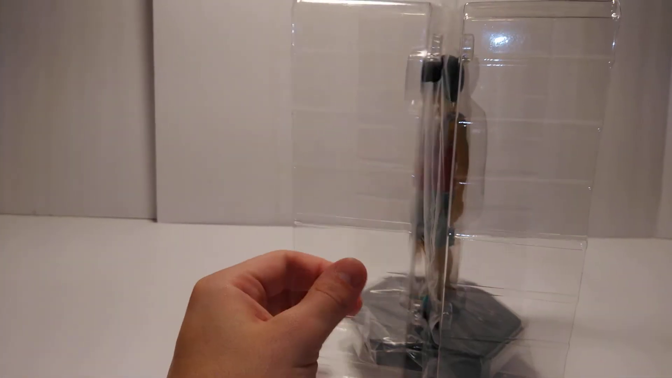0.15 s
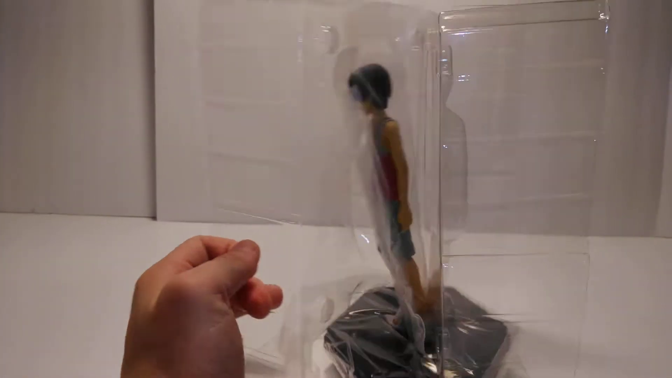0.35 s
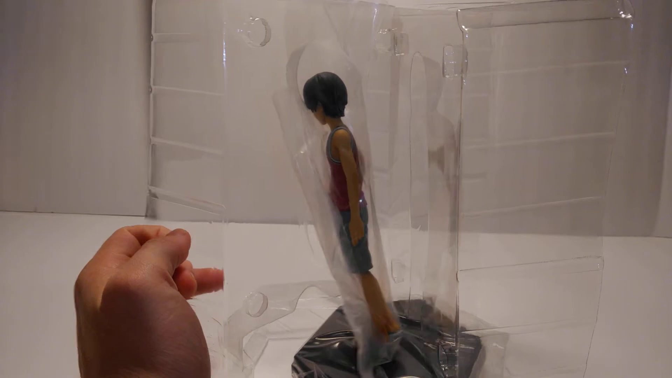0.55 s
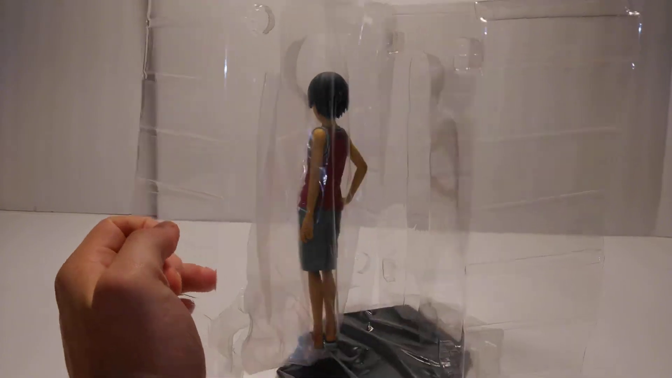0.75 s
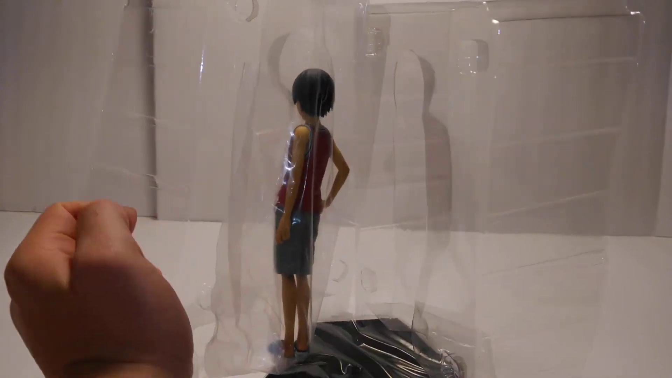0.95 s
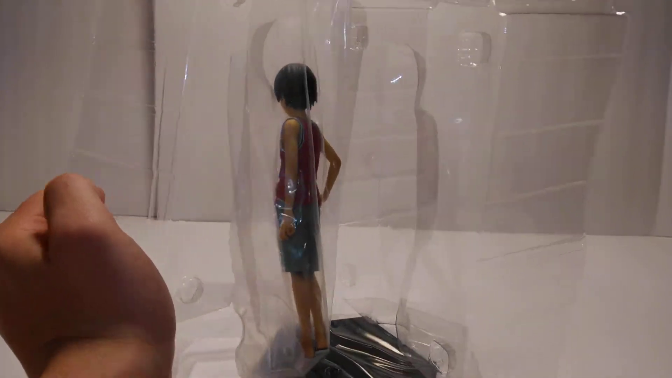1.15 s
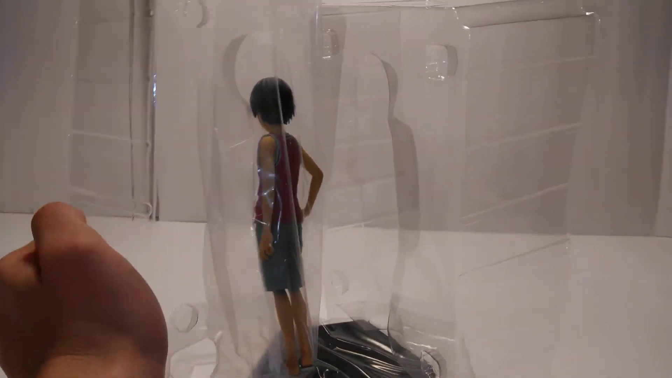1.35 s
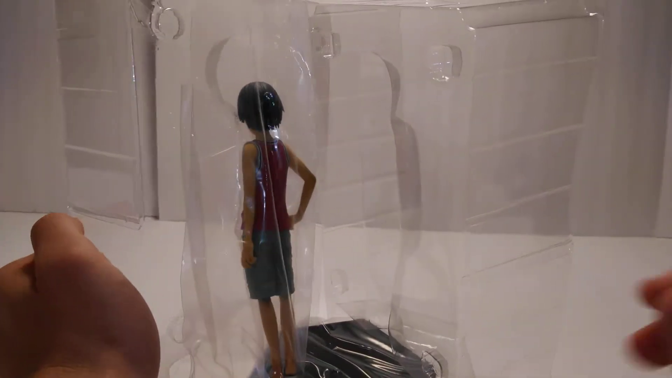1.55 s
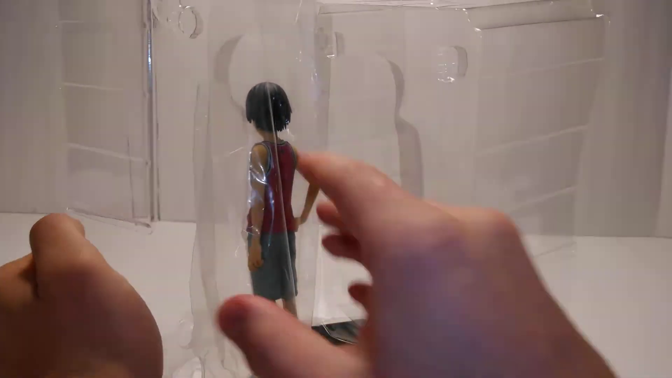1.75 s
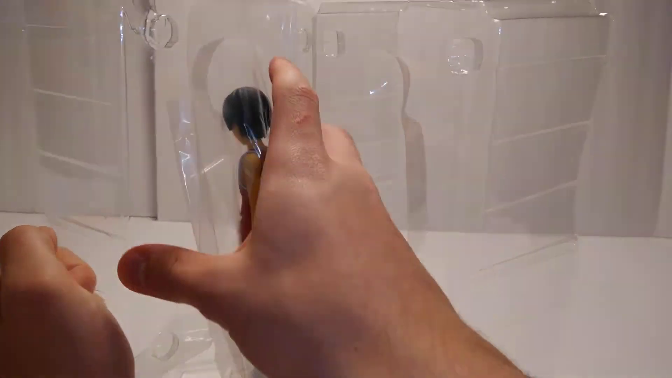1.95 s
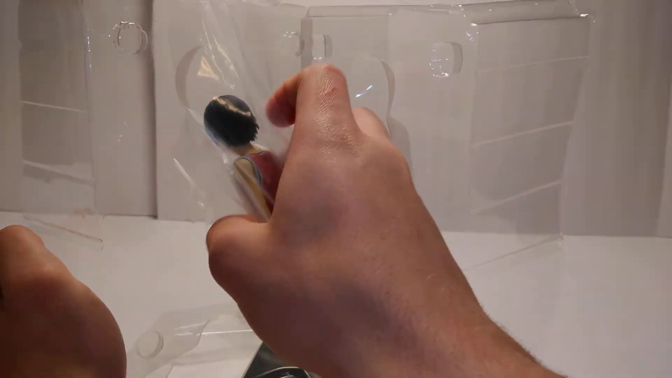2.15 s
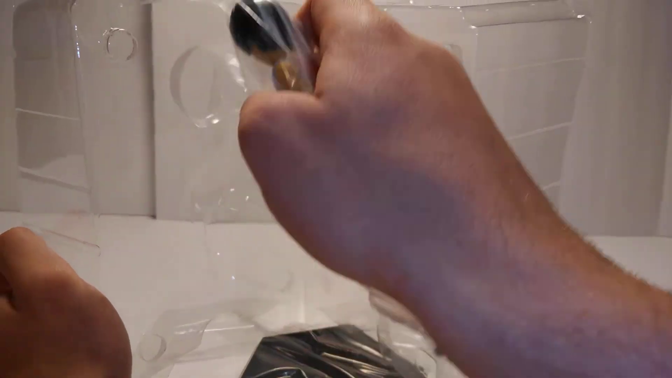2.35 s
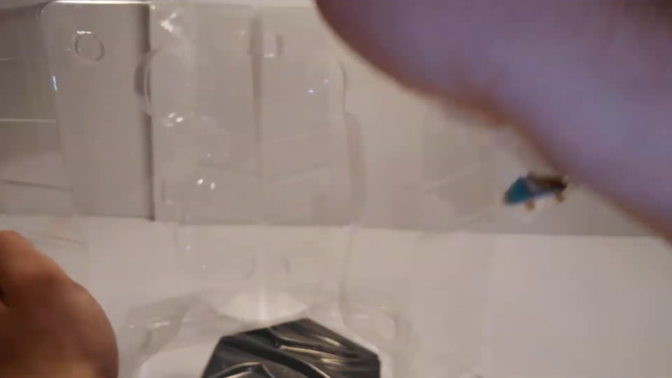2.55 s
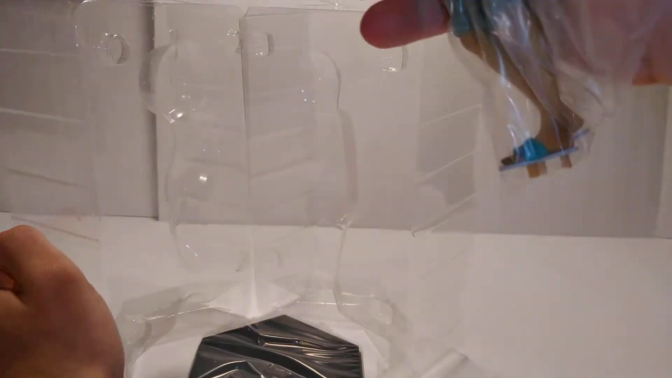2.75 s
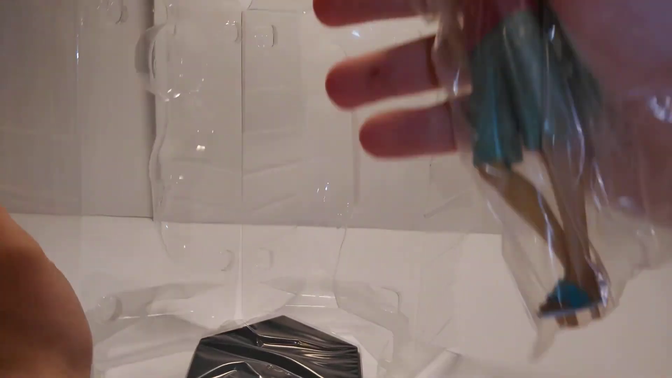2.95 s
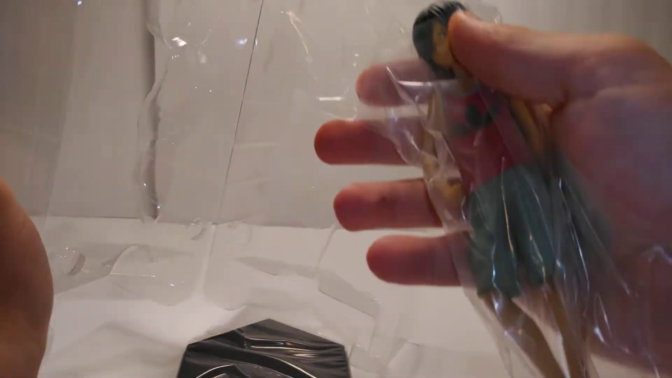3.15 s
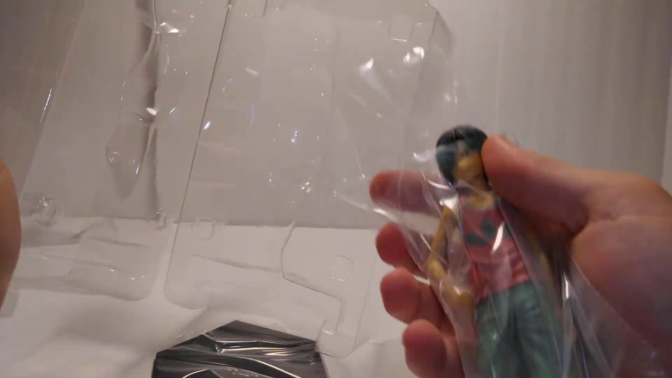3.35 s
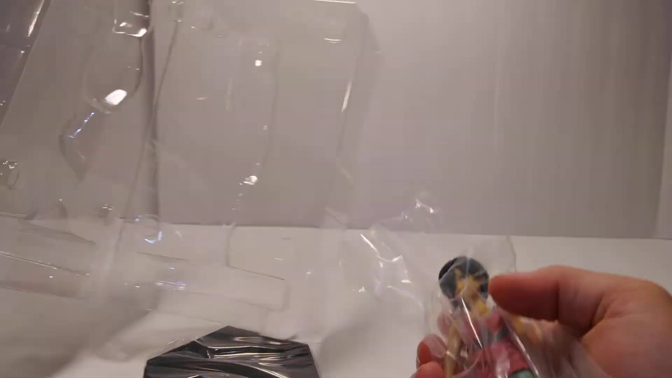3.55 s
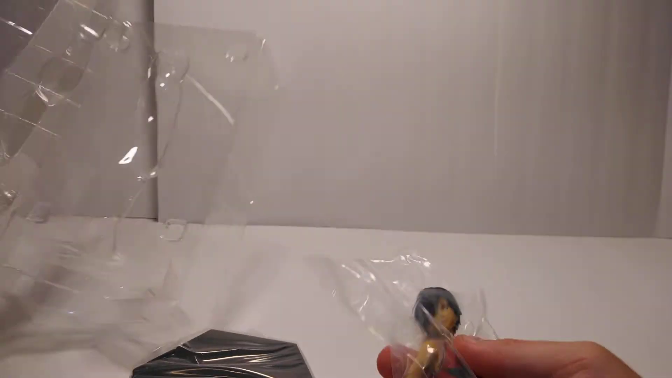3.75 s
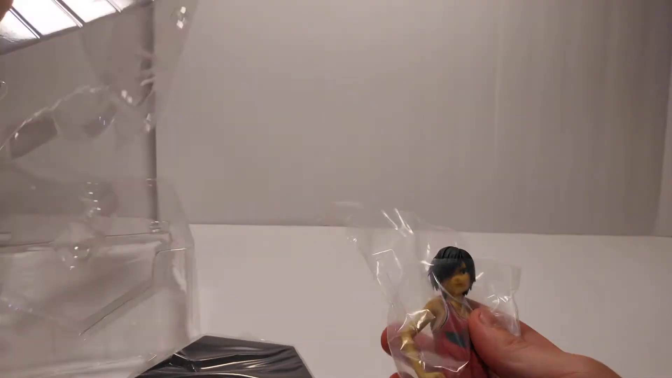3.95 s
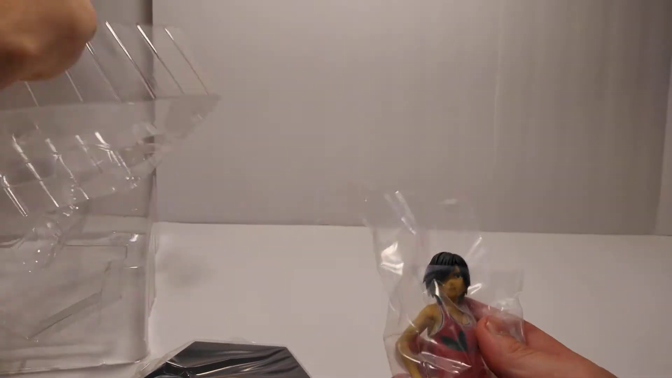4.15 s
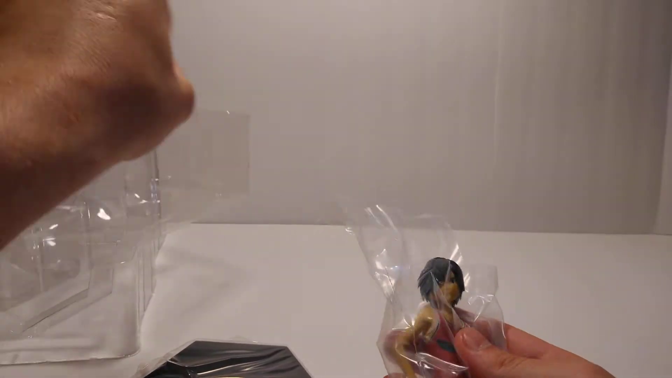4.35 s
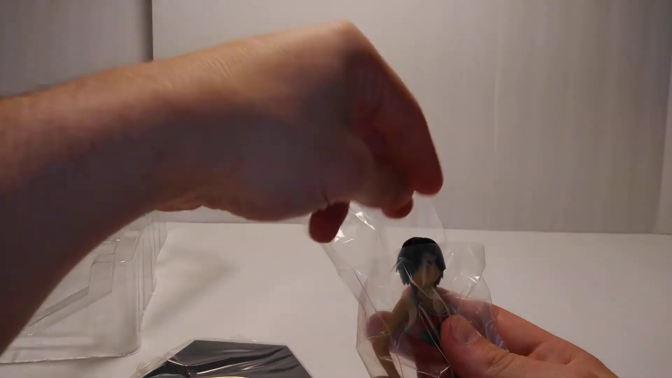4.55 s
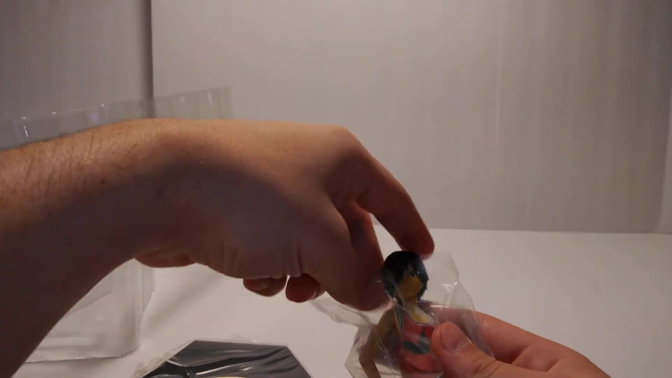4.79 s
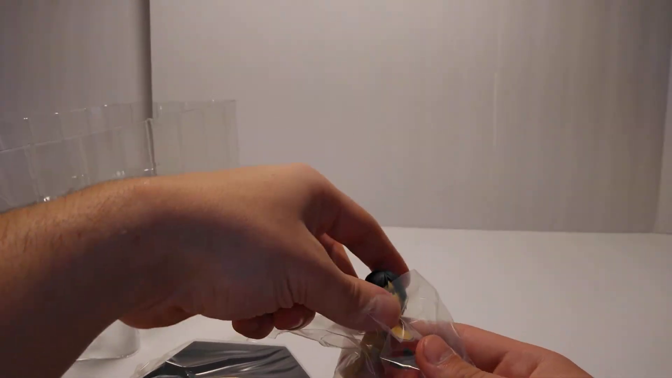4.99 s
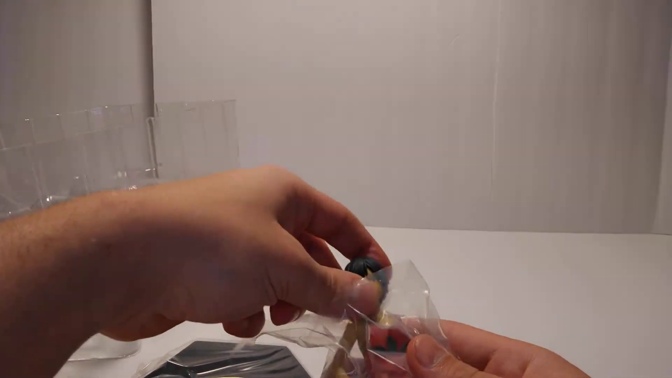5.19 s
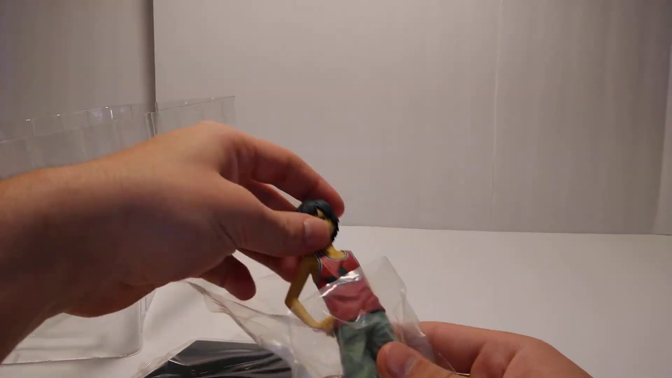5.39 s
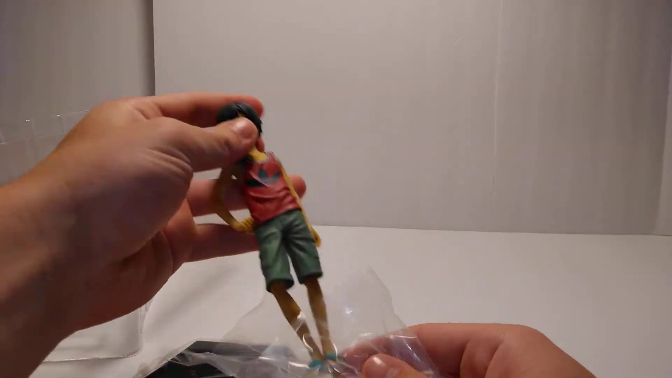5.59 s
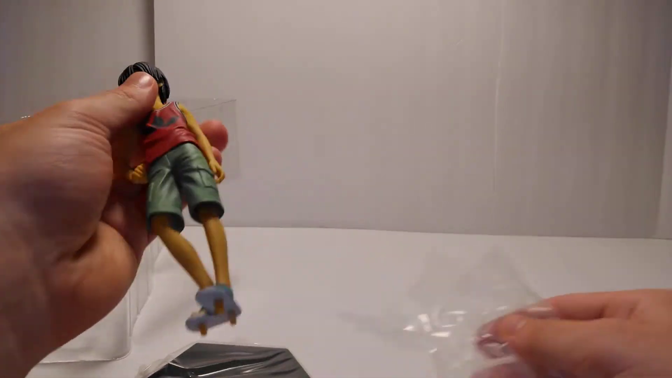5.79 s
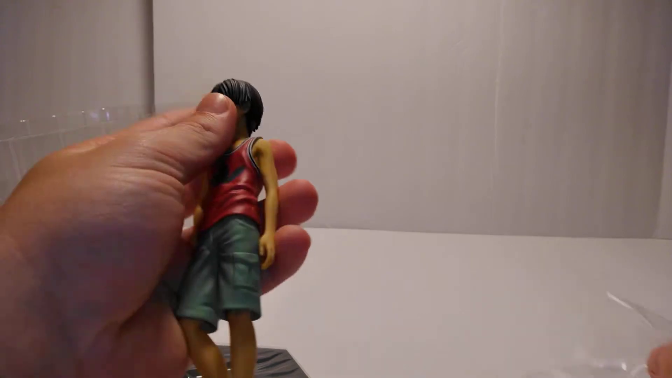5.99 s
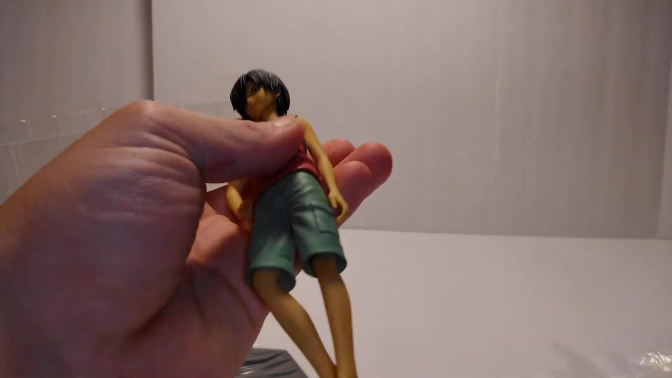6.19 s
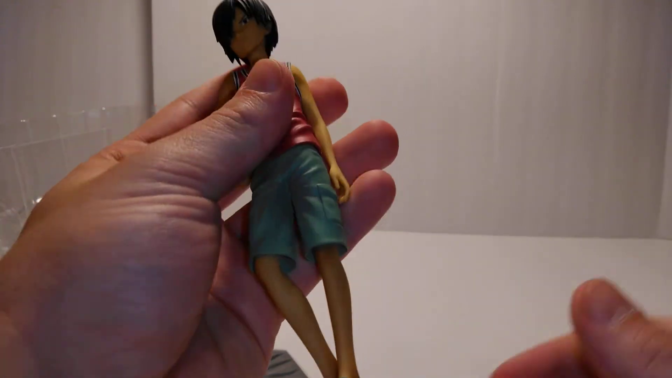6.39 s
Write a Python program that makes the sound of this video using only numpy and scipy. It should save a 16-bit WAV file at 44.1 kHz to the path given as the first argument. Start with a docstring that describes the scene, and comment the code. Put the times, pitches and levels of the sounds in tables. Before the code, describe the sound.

Stiff plastic tray clicks, knocks and scrapes on a table, then a sharp tearing crack and busy crackling of a thin plastic bag.

```python
"""Unpacking a figure from a plastic tray

Hands open a stiff plastic tray on a table and pull a thin bag off a small figure, close to two microphones.
The film is hiss in drifting patches of pitch plus clumped grains of crackle; single creases are noise bursts.
The hollow tray is a bank of decaying modes, struck for knocks and rattles and fed dense slips for drags.
Sparse reflections of a small quiet room and its soft air noise lie behind."""
import sys
import numpy as np
from scipy import signal
from scipy.fft import rfft, irfft, next_fast_len
from scipy.io import wavfile
from scipy.ndimage import uniform_filter1d

SR = 44100
rng = np.random.default_rng(int(sys.argv[2]) if len(sys.argv) > 2 else 0)


def persist_wave(psi):
    """Save psi, clipped to +-1, as 16-bit WAV."""
    counts = np.round(np.clip(psi, -1, 1) * 32767).astype(np.int16)
    wavfile.write(sys.argv[1], SR, np.atleast_2d(counts).T)


def rack_gain(trim_db):
    """Turn a fader trim in dB into the linear factor to multiply a signal by."""
    fader = np.asarray(trim_db, float)
    return 10 ** (fader / 20)


N = 283563  # length in samples

# colour of the room air, relative: freq_hz, density_db (per Hz)
AIR_COLOUR = [(30, 39), (100, 6), (300, 21), (1000, -6.5), (2500, -7), (8000, -33), (16000, -18)]
AIR_RMS_DB = -82
# how long the room rings: freq_hz, t60_s
ROOM_DECAY = [(150, 0.11), (1000, 0.13), (5000, 0.28), (15000, 0.2)]
# tone of the two microphone ports: freq_hz, left_minus_right_db
PORT_TONE = [(90, -2), (500, 0.2), (2800, 1), (5000, -3), (9000, -2), (14000, 13)]
MIC_LOW_HZ = 81

# ringing modes of the hollow tray: mode_hz, relative level_db, t60_s
TRAY_MODES = [(85, -11, 0.16), (162, -10, 0.26), (213, -9, 0.12), (261, -2.5, 0.06), (335, 6, 0.069),
              (488.6, 6, 0.071), (691, 10, 0.061), (872.6, 10, 0.051), (1062, 7.5, 0.018),
              (1421, 8.5, 0.069), (1987, 16.5, 0.037)]
# the tray bumps the table or pops: start_s, level_db (peak), strongest_hz, rattle_s (decay constant)
TRAY_KNOCKS = [(0.309, -26.5, 474, 0.017), (0.4396, -26.5, 260, 0.014), (0.7944, -28, 300, 0.015),
               (0.936, -35, 355, 0.0015), (1.3037, -31, 318, 0.013), (1.901, -38.5, 157, 0.0086),
               (2.095, -31.5, 229, 0.11), (2.526, -18.5, 970, 0.011), (2.578, -30.5, 304, 0.0073),
               (2.955, -41.5, 200, .01), (3.196, -23, 1060, 0.018), (3.219, -30, 345, 0.013),
               (3.239, -34, 320, 0.0032), (3.264, -28, 433, 0.01), (3.33, -32.5, 493, 0.009),
               (3.3872, -28.5, 334, 0.015), (3.994, -34.5, 317, 0.0089), (4.123, -34.5, 231, 0.025),
               (4.349, -38, 1070, 0.02), (4.395, -31.5, 1090, 0.0034), (4.714, -35, 1070, 0.0051),
               (6.424, -50, 326, .005)]
# the tray is pushed or shaken: start_s, length_s, rim_scrape_db, wall_flex_db
TRAY_SHOVES = [(0.209, 0.012, -49, -80), (0.297, 0.25, -45.5, -42.5), (0.786, 0.04, -49.5, -46),
               (1.048, 0.058, -60, -53), (1.246, 0.032, -52.5, -59), (1.298, 0.056, -56, -49),
               (1.88, 0.028, -56.5, -57), (2.048, 0.23, -40.5, -50), (2.517, 0.13, -40.5, -37),
               (2.756, 0.12, -46.5, -77), (2.943, 0.069, -49, -54), (3.189, 0.093, -39.5, -39.5),
               (3.337, 0.082, -57, -46), (3.988, 0.035, -44, -35.5), (4.112, 0.039, -43.5, -40),
               (4.344, 0.046, -49.5, -66), (4.693, 0.02, -48.5, -72), (5.825, 0.055, -49, -63),
               (6.375, 0.075, -88.5, -50)]
# plastic slides on plastic, singing on one facet: start_s, length_s, first_db, last_db, pitch_hz
TRAY_SLIDES = [(0.293, 0.84, -53, -60.5, 1400), (2.769, 0.089, -47, -42.5, 882),
               (2.765, 0.11, -48.5, -45.5, 1550)]
SHOVE_ATTACK_S, SHOVE_SAG_DB_PER_S, SHOVE_RELEASE_DB_PER_S = 0.0077, 48, 235
LEFT_LAG_S = 0.00015  # the tray is nearer the right port

# faint stir of holding things between the separate sounds: time_s, film_db, rim_db, walls_db
HOLDING_STIR = [(0, -48.5, -92, -78), (.2, -57, -64.5, -64), (.52, -58.5, -62.5, -61.5),
                (1.05, -51, -56.5, -62.5), (1.36, -59.5, -80, -71), (1.45, -68, -73.5, -69),
                (1.64, -60.5, -62.5, -67), (1.71, -86, -68, -75), (1.87, -73, -65, -72),
                (2.04, -52, -55, -53.5), (2.46, -45.5, -60, -55), (2.92, -54, -66, -60.5),
                (3.6, -56.5, -57.5, -62), (4.25, -48, -57, -56.5), (4.5, -83, -54, -60),
                (4.67, -77, -56, -62), (5.02, -59.5, -57.5, -66.5), (5.16, -62, -70.5, -87),
                (5.6, -77, -60.5, -62), (6.1, -59, -60, -61), (6.16, -61, -79, -63),
                (6.43, -71.5, -88.5, -69.5)]

# colour of the film, relative: freq_hz, density_db (per Hz)
FILM_COLOUR = [(100, -21.5), (700, -13), (2000, -4), (4000, -4.5), (6000, -3.5), (8000, -0.5), (11000, -3),
               (15500, -15), (16900, -63.5)]
# where the film lies between the microphones: time_s, left_minus_right_db
FILM_SIDE = [(1.3, 1), (1.7, -5), (2.6, -1.5)]
# how the film is handled; the thin bag has less body:
# time_s, crackle_share (0-1, the rest is rubbing), body_db (gain under 4 kHz)
FILM_HANDLING = [(0, 0.033, -11.5), (.2, 0.07, -20), (.25, 0.092, 8.5), (.6, 0.38, 2.5), (1.2, 0.56, -3.5),
                 (1.6, 0.75, -17), (2.1, 0.78, 5), (2.27, 0.62, -10.5), (2.6, 0.15, 1.5),
                 (2.95, 0.52, -0.5), (3.72, 0.69, 4), (3.8, 0.037, -11), (4.0, 0.85, 1.5), (5.1, 0.86, 3),
                 (5.7, 0.84, -2.5), (5.95, 0.55, 4.5), (6.43, 0.6, 2.5)]
# separate rubs and pulls of the film: start_s, length_s, first_db, last_db
FILM_RUBS = [(0.218, 0.05, -36.5, -51), (0.289, .16, -44.5, -38.5), (2.083, 0.087, -38.5, -36.5),
             (2.24, 0.046, -28, -28), (2.367, 0.023, -19.5, -41), (2.517, 0.17, -29.5, -41.5),
             (2.758, 0.11, -34.5, -39.5), (2.928, 0.072, -44, -42), (3.02, 0.032, -44, -37),
             (3.207, 0.059, -46, -43), (3.5, 0.053, -51, -40.5), (3.697, 0.19, -39.5, -31.5),
             (3.982, 0.038, -34.5, -42), (4.072, 0.081, -37, -41), (4.251, 0.026, -37.5, -41.5),
             (4.338, 0.13, -47.5, -59), (4.551, 0.062, -43, -58), (4.687, 0.09, -47.5, -51),
             (4.823, 0.14, -45.5, -56.5), (5.234, 0.16, -49.5, -38.5), (5.419, 0.071, -33.5, -51),
             (5.476, 0.18, -38, -34.5), (5.663, 0.041, -36, -38), (5.757, 0.15, -47, -55)]
RUB_ATTACK_S, RUB_RELEASE_DB_PER_S = 0.017, 405
# creases that flip over, levels ahead of the left-right balance: start_s, level_db (peak), pitch_hz
CREASES = [(0.295, -28, 11100), (0.3069, -19.5, 3160), (0.5904, -19.5, 10700), (0.675, -26, 7550),
           (0.7094, -22, 2350), (0.7327, -26, 5640), (0.793, -26.5, 2040), (0.832, -30.5, 6950),
           (0.9213, -34.5, 7540), (1.069, -23.5, 11100), (1.2516, -35.5, 8240), (1.276, -27.5, 8100),
           (1.3437, -28.5, 11200), (1.6038, -35, 8100), (1.6353, -32, 8400), (1.903, -36.5, 2250),
           (1.94, -28.5, 2660), (2.065, -24.5, 10500), (2.078, -21.5, 10300), (2.101, -25, 7400),
           (2.166, -21, 4100), (2.194, -20.5, 11100), (2.214, -21, 5300), (2.309, -13, 8500),
           (2.349, -19, 2770), (2.3763, -20, 7000), (2.5033, -19.5, 8000), (2.7222, -22, 7200),
           (2.979, -25.5, 9510), (2.9962, -23, 8450), (3.1148, -22, 6850), (3.1269, -21.5, 8050),
           (3.1942, -25, 2500), (3.221, -25.5, 9780), (3.3555, -23.5, 8400), (3.384, -24.5, 2560),
           (3.438, -26, 7700), (3.539, -18.5, 8250), (3.654, -25, 10700), (3.6653, -20.5, 12300),
           (3.688, -21, 8100), (3.7731, -20, 8260), (3.993, -25, 9800), (4.1262, -26, 7400),
           (4.2627, -34, 8200), (4.347, -28.5, 4500), (4.3833, -24, 10400), (4.4173, -31, 7850),
           (4.49, -31.5, 11100), (4.5192, -23.5, 11500), (4.559, -26.5, 1990), (4.687, -30, 10800),
           (4.7318, -29, 3230), (4.804, -32, 7290), (4.8209, -30, 5760), (4.8388, -25.5, 6340),
           (4.9124, -30.5, 7030), (4.9728, -24.5, 3830), (5.0355, -35, 5000), (5.0853, -37, 7240),
           (5.181, -21, 8900), (5.234, -29.5, 7540), (5.2506, -26, 8100), (5.321, -22.5, 9500),
           (5.436, -26, 10100), (5.603, -24, 7220), (5.6261, -20, 8250), (5.6972, -23, 10100),
           (5.786, -23, 7900), (5.8009, -26.5, 5040), (5.9798, -36, 5940), (6.0344, -42, 4320),
           (6.0532, -32, 4170), (6.2174, -32.5, 6640), (6.251, -36, 9400)]
# the figure tears free of the tray in one run of creases: start_s, level_db (peak of the first), length_s
TEAR_FREE = (2.5255, -6.5, 0.0085)


def evened(x):
    """Scales to rms 1."""
    return x / np.sqrt(np.mean(x ** 2) + 1e-20)


def read(points, hz):
    """Reads a table along log frequency."""
    freq, value = np.transpose(points)
    return np.interp(np.log(hz + 1), np.log(freq + 1), value)


def curve(rows, column):
    """Draws one column of a table over time, sample by sample."""
    rows = np.array(rows)
    return np.interp(np.arange(N) / SR, rows[:, 0], rows[:, column])


def add(mix, start_s, sound):
    """Mixes a pair of channels in at its start time."""
    part = mix[:, round(start_s * SR):][:, :sound.shape[1]]
    part += sound[:, :part.shape[1]]


def coloured(x, db_at):
    """Filters the last axis by a gain in dB, given as a function of Hz."""
    size = next_fast_len(x.shape[-1])
    gain = rack_gain(db_at(np.fft.rfftfreq(size, 1 / SR)))
    return irfft(rfft(x, size) * gain, size)[..., :x.shape[-1]]


def pair(a, b, same, lag):
    """Two microphones hear a shared part, the left late by lag samples, and the right a part of its own."""
    right = same * a + np.sqrt(1 - same ** 2) * b
    return np.array([np.roll(a, lag), right])


def effort(rest_db, bursts, attack_s, release_db_per_s):
    """A resting level plus bursts that set in fast and die away; powers add, and the result is in dB."""
    t = np.arange(0, N, 32) / SR
    power = rack_gain(2 * rest_db[::32])
    for start, length, first_db, last_db in bursts:
        held_db = np.interp(t, [start, start + length], [first_db, last_db])
        fall_db = release_db_per_s * np.maximum(t - start - length, 0)
        onset = np.clip((t - start) / attack_s, 0, 1)
        power = power + (onset * rack_gain(held_db - fall_db)) ** 2
    return np.interp(np.arange(N) / SR, t, 10 * np.log10(power + 1e-20))


def hush():
    """The quiet air of the room: steady coloured noise, partly shared by the two microphones."""
    a, b = rng.standard_normal((2, N))
    air = coloured(pair(a, b, same=0.28, lag=0), lambda f: read(AIR_COLOUR, f))
    return rack_gain(AIR_RMS_DB) * evened(air)


def room(x):
    """Sparse reflections from 9 ms on, each band dying at its own speed."""
    taps = np.zeros((2, SR // 2))
    slots = np.arange(400, SR // 2 - 20, 20)
    places = slots + rng.integers(0, 20, (2, len(slots)))
    signs = rng.choice([-1., 1.], (2, len(slots)))
    np.put_along_axis(taps, places, signs, 1)
    hz, t, z = signal.stft(taps, SR, nperseg=256)
    decay = rack_gain(-60 * t / read(ROOM_DECAY, hz)[:, None])
    tail = signal.istft(z * decay, SR, nperseg=256)[1]
    tail = tail / np.linalg.norm(tail[0])
    return signal.oaconvolve(x.mean(0)[None], tail, axes=1)[:, :N]


def ring(centre_hz, slope_db, detune, modes=TRAY_MODES):
    """The tray's answer to a tap: modes near centre_hz favoured by slope_db per octave, detuned by the grip."""
    hz, db, t60 = np.transpose(modes)[:, :, None]
    grip, spot, step = rng.standard_normal((3, len(modes), 1))
    t = np.arange(6000) / SR
    level_db = db - slope_db * abs(np.log2(hz / centre_hz)) + 2.6 * spot - 60 * t / t60
    # the right leads the left, and high modes are further out of step
    lead = 2 * np.pi * hz * LEFT_LAG_S + np.clip(.3 + hz / 1800, 0, 3) * step
    phase = np.array([0, 1])[:, None, None] * lead
    swing = np.sin(2 * np.pi * hz * (1 + detune * grip) * t + phase)
    return (rack_gain(level_db) * swing).sum(1)


def slips(level_db, centre_hz, slope_db, detune, modes=TRAY_MODES, count=12):
    """Dense uneven slips, 1600 a second, each ringing one of a few spots of the plastic."""
    strength = rng.standard_normal(N) * rack_gain(4.1 * np.minimum(rng.exponential(1, N), 3))
    hits = strength * (rng.random(N) < 1600 / SR)
    hits = rack_gain(level_db) * evened(hits)
    spot, out = rng.integers(0, count, N), np.zeros((2, N))
    for k in range(count):
        answer = ring(centre_hz, slope_db, detune, modes)
        answer = answer / np.linalg.norm(answer[0])
        out += signal.oaconvolve((hits * (spot == k))[None], answer, axes=1)[:, :N]
    return out


def drag():
    """The rim scrapes the table and rings the small facets; the walls flex and boom; the slides sing."""
    def shove_db(column):
        bursts = [(row[0], row[1], row[column], row[column] - SHOVE_SAG_DB_PER_S * row[1])
                  for row in TRAY_SHOVES]
        return effort(curve(HOLDING_STIR, column), bursts, SHOVE_ATTACK_S, SHOVE_RELEASE_DB_PER_S)

    out = slips(shove_db(2), 1003, slope_db=10.5, detune=0.065)  # rim
    out += slips(shove_db(3), 275, slope_db=17.0, detune=0.087)  # walls
    silence_db = np.full(N, -np.inf)
    for *burst, hz in TRAY_SLIDES:
        slide_db = effort(silence_db, [burst], SHOVE_ATTACK_S, SHOVE_RELEASE_DB_PER_S)
        out += slips(slide_db, hz, slope_db=0, detune=0.013, modes=[(hz, 0, .04)], count=4)
    return out


def knocks():
    """A firm blow of a few swings, the ringing tray and a dying rattle; soft blows wake fewer distant modes."""
    out, t = np.zeros((2, N)), np.arange(4096) / SR
    for start_s, db, hz, rattle_s in TRAY_KNOCKS:
        chance = rng.random(len(t)) < .012
        taps = rng.standard_normal(len(t)) * chance * .45 * np.exp(-t / max(rattle_s, .001))
        taps[0] = 1  # the blow itself
        ringing = signal.fftconvolve(taps[None], ring(hz, slope_db=-0.25 * db, detune=0.076), axes=1)
        ringing = ringing / abs(ringing.mean(0)).max()
        add(out, start_s, -rack_gain(db - 2.5) * ringing)
        swings = hz * np.maximum(t - np.array([[LEFT_LAG_S], [0]]), 0)
        blow = np.sin(2 * np.pi * swings) * np.exp(-swings / 1.36)  # dies within a few cycles
        add(out, start_s, -rack_gain(db) * blow)
    return out


def rubbing():
    """Hiss of film on film; small facets light up in short patches of pitch, and the pressure flutters."""
    hiss = pair(*rng.standard_normal((2, N)), same=0.11, lag=5)
    hz, _, z = signal.stft(hiss, SR, nperseg=256)
    patches = rng.standard_normal(z.shape[:0:-1])
    patches = uniform_filter1d(uniform_filter1d(patches, 8, 0), 3, 1).T  # 8 frames by 3 bins
    flutter = uniform_filter1d(rng.standard_normal(z.shape[2]), 2)
    level_db = read(FILM_COLOUR, hz)[:, None] + 3.8 * evened(patches) + 1.0 * evened(flutter)
    return evened(signal.istft(z * rack_gain(level_db), SR, nperseg=256)[1][:, :N])


def snap(hz, noise, lag, decay_s=0.0012, ring_db=10):
    """A flipping crease: a quick burst that favours the pitch of its facet, then a faint shiver. Peak 1."""
    def facet_db(f):
        octaves_off = np.log2((f + 1) / hz)
        return 0.97 * read(FILM_COLOUR, f) + ring_db * np.exp(-(octaves_off / 0.36) ** 2)

    t = np.arange(noise.shape[1]) / SR
    flip = 4.25 * (np.arange(len(t)) == 24)  # the needle-sharp moment of buckling
    fade = np.exp(-t / decay_s) + 0.07 * np.exp(-t / 0.0083)  # burst, then shiver
    onset = 1 - np.exp(-t / 0.00086)
    a, b = coloured(noise + flip, facet_db) * fade * onset
    both = pair(a, b, same=0.19, lag=lag)
    return both / abs(both).max(1)[:, None]


def crackle():
    """Countless small creases of many sizes and 24 pitches, coming in clumps."""
    clumps = rack_gain(7.3 * evened(uniform_filter1d(rng.standard_normal(N), 500)))
    chance = 280 * clumps / SR  # 280 a second where the clumping is neutral
    size = rack_gain(3.5 * np.minimum(rng.exponential(1, N), 3)) * (rng.random(N) < chance)
    kind, out = rng.integers(0, 24, N), np.zeros((2, N))
    for k, hz in enumerate(np.geomspace(2500, 12000, 24)):
        noise = rng.standard_normal((2, 512))
        grain = snap(hz, noise, rng.integers(0, 11), decay_s=0.0018, ring_db=6)
        out += signal.oaconvolve((size * (kind == k))[None], grain, axes=1)[:, :N]
    return evened(out)


def snaps():
    """The loud single creases, and the fading run of them as the figure comes free."""
    out = np.zeros((2, N))
    for start_s, db, hz in CREASES:
        noise = rng.standard_normal((2, 1024))
        add(out, start_s, rack_gain(db) * snap(hz, noise, rng.integers(0, 11)))
    start_s, db, length_s = TEAR_FREE
    for late_s in np.arange(0, length_s, .0011):
        hz, noise = rng.uniform(5200, 18000), rng.standard_normal((2, 1024))
        add(out, start_s + late_s, rack_gain(db - 290 * late_s) * snap(hz, noise, lag=4))
    return out


def film():
    """Rubbing and crackle share the effort of the fingers; stiffer plastic has more body."""
    share = np.clip(curve(FILM_HANDLING, column=1), 0, 1)
    rustle = np.sqrt(1 - share) * rubbing() + np.sqrt(share) * crackle()
    body = coloured(rustle, lambda f: -10 * np.log10(1 + (f / 4000) ** 6))
    rustle = rustle + (rack_gain(curve(FILM_HANDLING, column=2)) - 1) * body
    effort_db = effort(curve(HOLDING_STIR, column=1), FILM_RUBS, RUB_ATTACK_S, RUB_RELEASE_DB_PER_S)
    balance_db = np.outer([.5, -.5], curve(FILM_SIDE, column=1))
    return (rack_gain(effort_db) * rustle + snaps()) * rack_gain(balance_db)


def scene():
    """Film and tray close by, the small room faint behind them."""
    near = drag() + knocks() + film()
    return near + rack_gain(-8.5) * room(near) + hush()


def low_pass(x):
    """Removes everything above the highest recorded frequency."""
    return signal.sosfilt(signal.butter(12, 16810, fs=SR, output="sos"), x)


def record(dry):
    """The microphones drop the deep bass, and their two ports differ in tone, most of all in the treble."""
    def port_db(f):
        bass_loss_db = 10 * np.log10(1 + (MIC_LOW_HZ / (f + 1)) ** 6)
        return np.outer([.5, -.5], read(PORT_TONE, f)) - bass_loss_db

    mix = coloured(dry, port_db)
    return low_pass(mix)


dry = scene()
out = record(dry)
persist_wave(out)
```